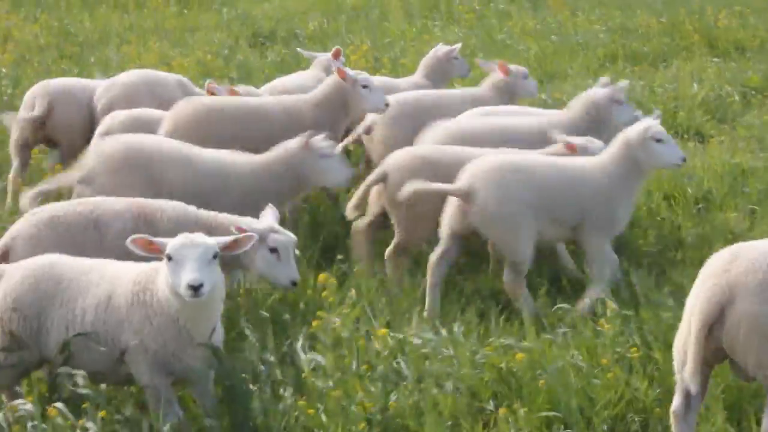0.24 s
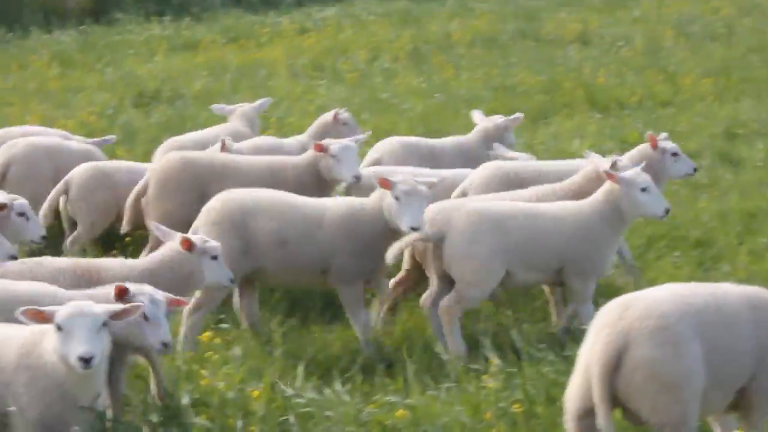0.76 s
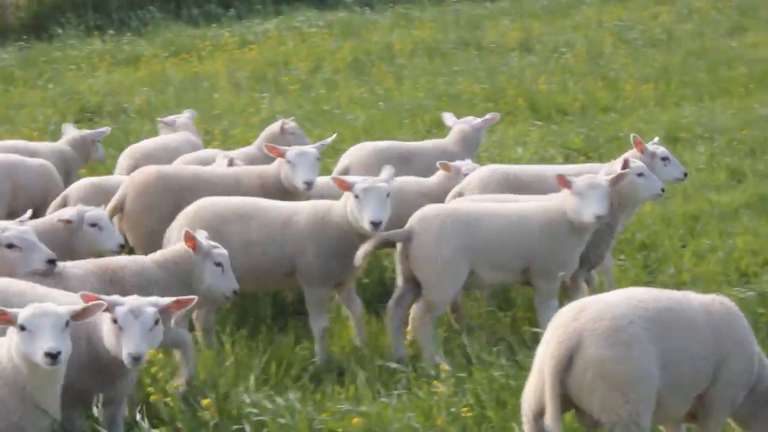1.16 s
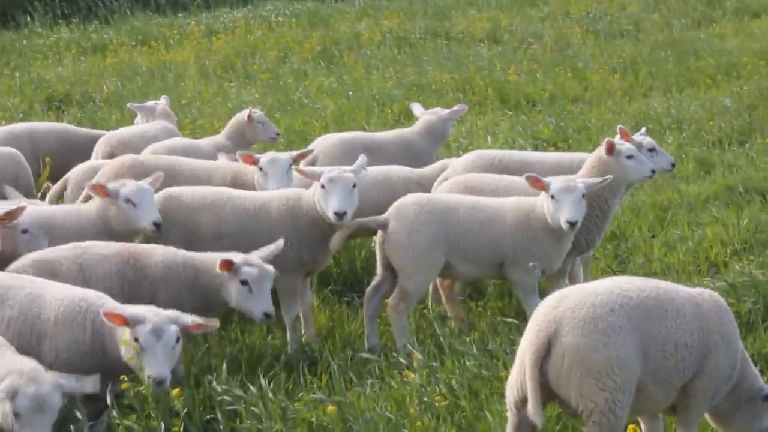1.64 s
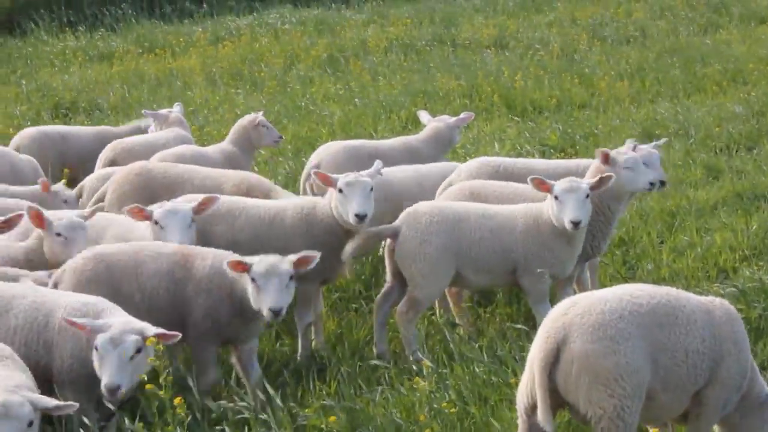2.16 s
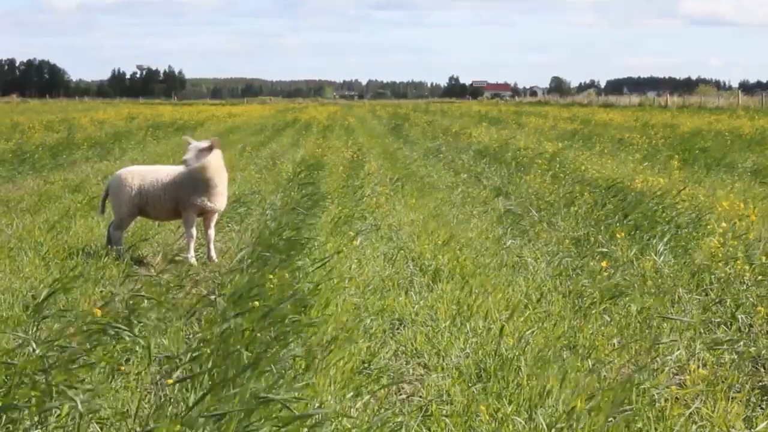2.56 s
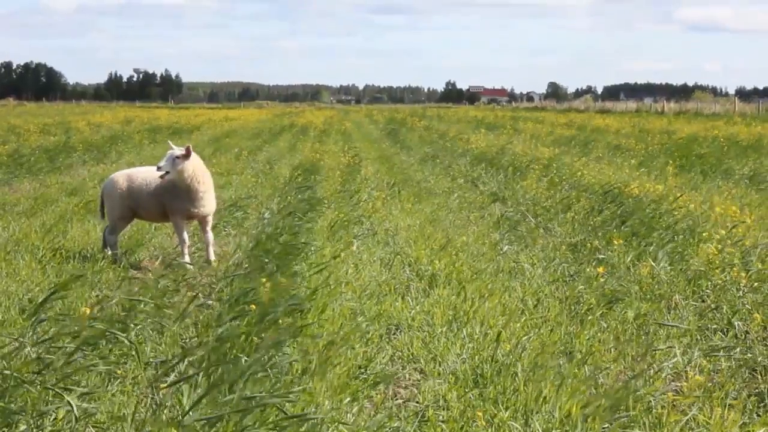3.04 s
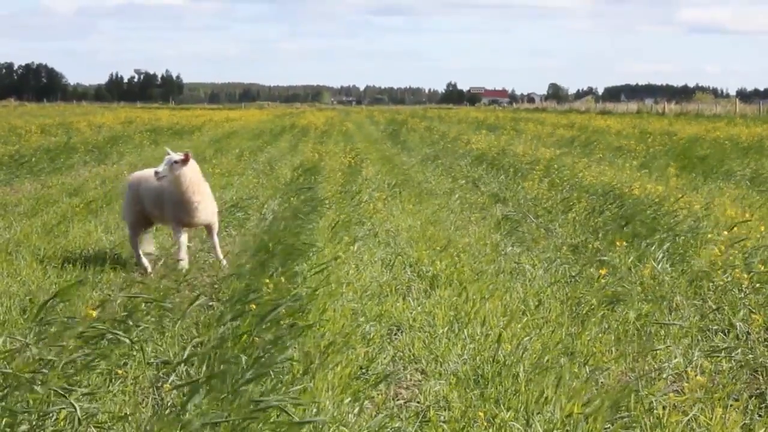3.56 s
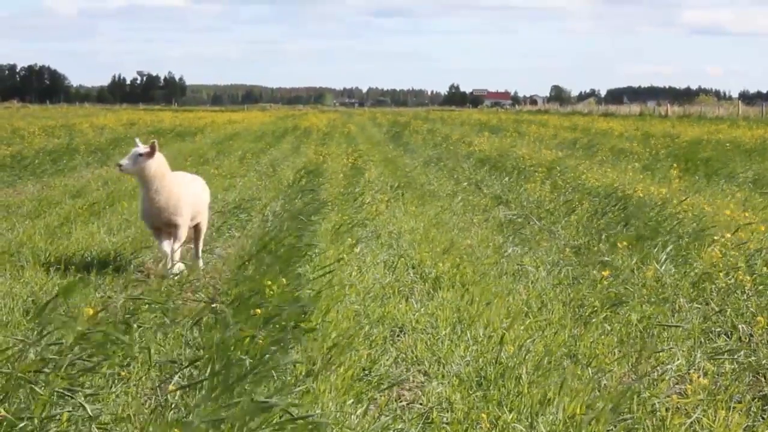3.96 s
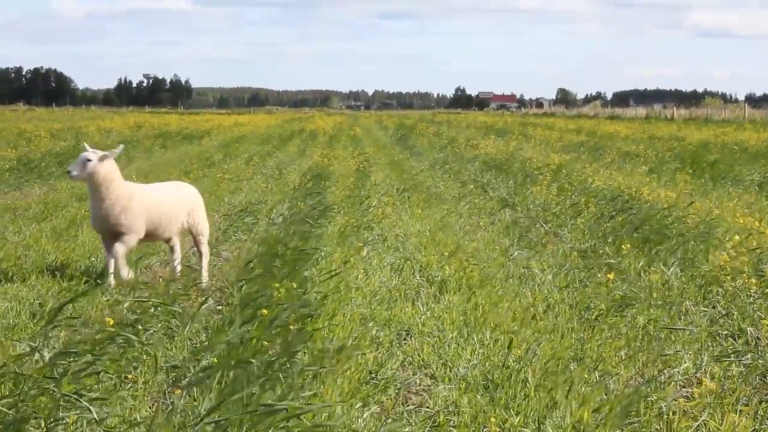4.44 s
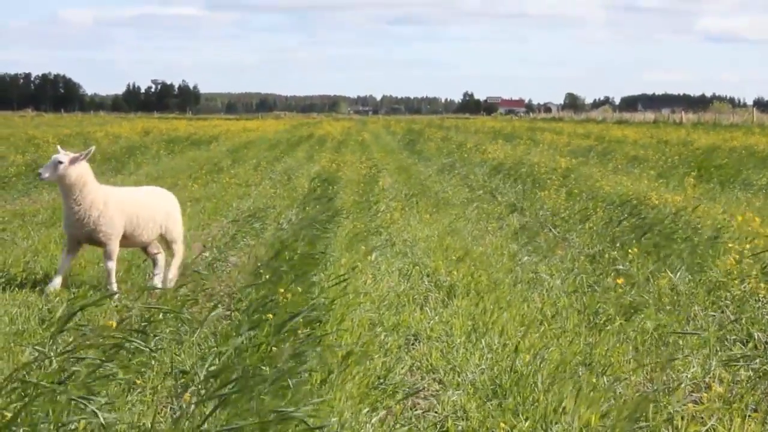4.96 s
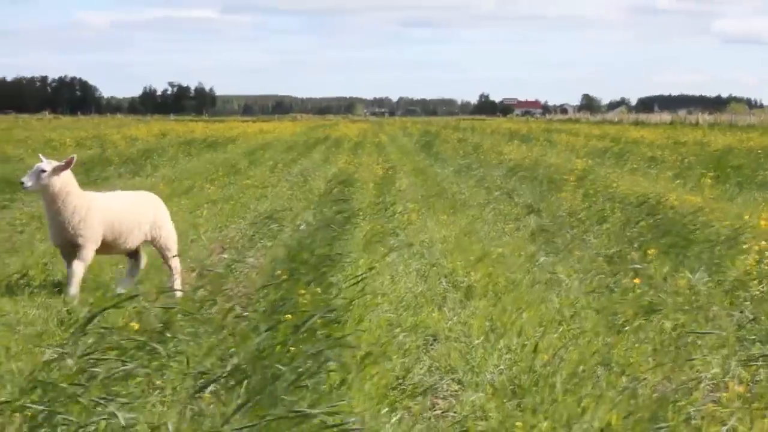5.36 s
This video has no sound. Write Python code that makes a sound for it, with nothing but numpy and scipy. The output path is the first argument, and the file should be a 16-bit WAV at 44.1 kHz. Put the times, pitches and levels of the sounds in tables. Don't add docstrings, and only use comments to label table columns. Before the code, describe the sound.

An open grassy field, dry and almost without echo. From 0 to about 2.4 s a flock tramples long grass, a soft bright rustle of tiny crackles. Over it come faint overlapping lamb calls: a trembling one at 0.4-1.1 s, a rough hoarse one at 0.75-1.2 s, a nearer choppy one at 1.2-1.6 s, and a low distant one at 1.5-1.9 s. A middling call fades from 2.1 to 2.6 s as the rustle vanishes. At 2.7-3.5 s one lamb bleats loudly, nasal and bright, starting through closed lips, opening wide, quavering quickly, then sagging into a brief breathy gasp. Dull low wind bumps hit the microphone irregularly throughout, hardest at 1.3 s, sparse during the loud bleat, clustered near 3.7-4.4 and 5.0-5.2 s. Afterwards the field is nearly silent, with small dry ticks from 3.6 s and a faint grass swish at 5.4 s.

```python
import sys
import numpy as np
from scipy import signal
from scipy.fft import rfft, irfft, next_fast_len
from scipy.io import wavfile
from scipy.ndimage import uniform_filter1d, map_coordinates

SR = 44100
rng = np.random.default_rng(int(sys.argv[2]) if len(sys.argv) > 2 else 0)


def output_pcm(signal):
    pcm = np.clip(np.atleast_2d(signal).T, -1, 1) * 32767
    wavfile.write(sys.argv[1], SR, np.round(pcm).astype(np.int16))


def boost(x):
    u = np.asarray(x, float) / 20
    return 10 ** u


N = 246959
SIZE = 1024

# (time [s], pitch [Hz], level [dB], mouth opening [0-1])
LONE_CALL = [
    (2.725, 187, -49.5, .65),
    (2.739, 166, -60, .75),
    (2.767, 214, -38, .9),
    (2.84, 236, -40, .97),
    (2.9, 243, -41.5, 1),
    (2.97, 237.5, -42, 1),
    (3.21, 239.5, -41.7, 1),
    (3.3, 232, -41.5, 1),
    (3.44, 203, -46.5, .92),
]
FIRST_CALL = [(.44, 270, -60, 0.7), (.52, 276.1, -58, 0.82), (.63, 275.5, -59, 1),
              (.72, 271.4, -57.5, 0.77), (.79, 283.3, -59.5, 0.92), (.9, 269.2, -58.5, 0.7),
              (1.0, 273.5, -59.5, 0.98), (1.05, 259.3, -58, 0.79)]
HOARSE_CALL = [(.76, 218.4, -59.5, 0.72), (.82, 219.6, -58, 0.86), (.9, 208.7, -57.5, 0.54),
               (.98, 205.2, -60, 0.72), (1.155, 206.9, -59, 0.63)]
NEAR_CALL = [(1.2, 263.2, -54.5, 0.49), (1.23, 270, -53, 0.62), (1.28, 250, -62.5, 0.63),
             (1.38, 269.7, -59.5, 0.82), (1.52, 265.5, -53, 0.67), (1.596, 269.4, -56.5, 0.7)]
FAR_CALL = [(1.52, 158, -63, 0.9), (1.62, 157, -63, .9), (1.69, 158, -63, 1), (1.76, 160, -63, 0.85),
            (1.82, 148, -67, .77), (1.87, 145, -69, 0.72)]
FADING_CALL = [(2.085, 224, -63, .9), (2.145, 236, -58, 1), (2.17, 241, -56, 1), (2.19, 224, -57.5, 1),
               (2.27, 224.5, -58, 1), (2.4, 222, -65, 1), (2.6, 208, -75, .9)]

# (time [s], level drop [dB])
LONE_CATCH = [(2.8034, 5), (2.8662, 3.5), (2.9272, 1.3), (2.9927, 0.5), (3.0579, 6), (3.1226, 3.5),
              (3.1901, 2), (3.2579, 1.5), (3.3295, 6), (3.408, 7), (3.462, 5.5)]
FIRST_CATCH = [(s, 3.1) for s in (.466, .56, .701, .83, .863, .941, .995)]
HOARSE_CATCH = [(.788, 4.4), (.861, 8.7), (.944, 8), (1.02, 7), (1.1, 6.7)]
NEAR_CATCH = [(1.33, 6), (1.408, 8.7), (1.484, 15.6), (1.555, 21)]
FAR_CATCH = [(1.629, 1), (1.72, 1.5), (1.81, 1.5)]
FADING_CATCH = [(2.121, 11), (2.263, 3.6), (2.289, 1.2), (2.328, 1.6), (2.361, 2.6), (2.43, 2.5),
                (2.496, 1.9), (2.57, 10)]

# (width [s], added width [s/dB], pitch drop [share], added drop [share/dB])
LONE_QUAVER = (.0098, .0008, .048, .0082)
FIRST_QUAVER = (.012, 0.0022, .033, 0.00076)
HOARSE_QUAVER = (0.021, 0.0005, .058, 0.0013)
NEAR_QUAVER = (0.019, 0.000429, 0.031, 0.00115)
FAR_QUAVER = (0.0081, 0.0055, 0.021, 0.014)
FADING_QUAVER = (0.0077, 0.00087, 0.052, 0.0033)

# (frequency [Hz], width [Hz], level [dB], sinking with a shut mouth [share])
LONE_THROAT = [(234, 160, -20.5, 0.055), (974, 57.5, 3.5, 0.52), (1297, 94, -11, .3), (2214, 160, 2, 0.16),
               (3525, 380, 2, 0.077), (4200, 250, 2.5, 0.05), (5280, 490, -11.5, 0.25),
               (6300, 160, -11.5, 0.045), (6900, 400, -47, .05), (8300, 500, -47, .05),
               (10570, 85, -23.5, 0.028)]
FIRST_THROAT = [(980, 155, -3.5, 0.23), (1540, 320, -12.5, 0.16), (2503, 140, 0.5, 0.34),
                (3620, 320, -5, 0.055), (5330, 850, -16, .03)]
HOARSE_THROAT = [(1003, 160, 9.5, 0.14), (2155, 280, 12, 0.19), (3670, 780, -1.5, 0.046)]
NEAR_THROAT = [(1068, 76, 12.5, 0.22), (2230, 730, -2, 0.19), (3640, 210, -1.5, 0.093),
               (5100, 520, -11, 0.026)]
FAR_THROAT = [(725, 87, 4.5, 0.2), (2034, 140, 7, 0.45), (2820, 1180, -4, .05)]
FADING_THROAT = [(982, 58, 2.5, 0.12), (2180, 170, -1, 0.071), (3420, 410, -8.5, 0.1),
                 (5560, 1600, -9.5, 0.035)]
# (frequency [Hz], width [Hz], depth [dB])
LONE_HOLLOWS = [(4700, 300, 14), (6600, 250, 7), (7600, 350, 10), (8300, 3000, 8), (9600, 450, 5),
                (13000, 1300, 12), (17000, 6000, 30)]

# (time [s], swing [share])
TURN = [(2.75, 0.22), (2.86, 0.14), (2.93, 0.7), (3.1, 1.07), (3.45, 0.97)]
# (frequency [Hz], level [dB])
FACING = [(2600, 1), (3400, -4), (4300, 2.5), (6300, 1), (7200, 6), (8400, 16.5), (9000, 3), (10500, 3),
          (11800, 6.5)]
PURSED = [(2.7, 3.5), (2.72, 0)], [(2500, -2.5), (3000, -12), (3600, -1.5)]
MUFFLED = [(2.745, 2), (2.765, 0.5)], [(700, -1.5), (1500, 1), (4500, -1), (5200, -1.5)]
TIRING = [(3.3, 0), (3.37, 1)], [(1000, 2), (1700, 2.5), (2600, -2.5), (3500, -8), (4300, -1), (5600, -1.5),
          (6300, -5), (12000, 1.5)]
TURNING = [(2.16, 3.5), (2.23, 1)], [(4500, -1.5), (5200, -3.5)]
NARROWED = [(2.18, 0.5), (2.2, 2.5)], [(700, -0.5), (980, -2), (1400, -1)]
LIFTED = [(1.69, -0.5), (1.74, 0.5), (1.82, -0.3)], [(2300, -3.5), (3000, 7), (4000, -5)]

ONSET_DB, RELEASE_DB, ONSET_FLAT = 18, 13, .035
OPENING_HZ, MOST_SLACK_DB = 500, 3.5
WANDER, DULLING = .006, .09

# (time [s], peak [dB], frequency [Hz])
EDDIES = [(0.033, -39.5, 247.0), (0.045, -40.5, 122.0), (0.089, -35, 205), (0.098, -37, 145.0),
          (0.27, -36.5, 147), (0.576, -39, 205), (0.585, -43, 85.0), (1.068, -33, 200), (1.294, -40.5, 121),
          (1.31, -29.5, 102), (1.405, -49, 59.6), (1.444, -42, 122.0), (1.466, -43, 84), (1.513, -46, 85.0),
          (1.551, -35.5, 172), (1.691, -38, 172), (1.712, -38.5, 84), (1.732, -34.5, 122.0),
          (1.796, -42.5, 101), (1.872, -42, 86), (2.078, -44.5, 210), (2.24, -38, 173.0), (2.357, -37, 144),
          (2.37, -34, 146), (2.383, -32.5, 175), (2.409, -41, 212), (2.422, -42.5, 103),
          (3.543, -42.5, 103), (3.685, -43.5, 105), (3.724, -28.5, 293), (3.737, -39, 122.0),
          (3.746, -33.5, 102), (3.756, -35, 147), (3.769, -37.5, 173.0), (3.869, -39, 240),
          (3.911, -43, 102.0), (3.92, -35, 169), (4.083, -30.5, 121), (4.211, -37, 103), (4.232, -38, 169),
          (4.247, -45, 85.0), (4.347, -41, 101), (4.356, -28.5, 122), (4.365, -46, 72.0),
          (4.915, -36.5, 178), (4.924, -46, 60.0), (4.984, -41, 86), (4.998, -40.5, 102.0), (5.03, -43, 86),
          (5.051, -41, 205), (5.08, -37.5, 173.0), (5.1, -37, 145.0), (5.115, -39, 142),
          (5.127, -40, 207.0), (5.147, -43, 172.5), (5.555, -38, 121), (5.564, -34.5, 148),
          (5.584, -40.5, 173.0),
          (0.07, -49, 122.0), (0.26, -43, 121), (0.339, -43.5, 145.0), (0.545, -42, 172),
                (0.991, -46.5, 125), (1.021, -47, 122.0), (1.078, -44, 103), (1.188, -45, 240),
                (1.323, -40, 58.9), (1.351, -44, 102.0), (1.413, -41, 145.0), (1.425, -41, 85.0),
                (1.455, -40.5, 175), (1.495, -41, 180), (1.529, -39.5, 123), (1.561, -43, 173.0),
                (1.658, -46, 60.0), (1.72, -42, 122.0), (1.752, -41.5, 175), (1.847, -46.5, 101),
                (1.863, -44, 120), (2.089, -43, 102.0), (2.307, -44.5, 85.5), (2.347, -44, 172),
                (2.397, -44, 60.3), (2.493, -41.5, 145.0), (3.13, -47.5, 178), (3.516, -45, 151.2),
                (3.526, -48, 125), (3.66, -46, 60.4), (3.79, -48, 145.0), (3.878, -38, 145.0),
                (3.901, -50, 102.0), (3.93, -44, 247.0), (3.939, -43, 72.0), (3.996, -47, 60.0),
                (4.016, -40.5, 105), (4.092, -58, 103), (4.116, -45, 144), (4.262, -45, 85.0),
                (4.335, -41, 102.0), (4.381, -43.5, 102.0), (4.506, -47, 60.0), (4.566, -45, 122.0),
                (4.604, -45, 121), (4.668, -44.5, 147), (4.747, -47, 59.7), (4.956, -46, 72.0),
                (5.039, -41, 145.0), (5.064, -42, 147), (5.138, -41.5, 207.0), (5.167, -47, 85.0),
                (5.189, -42.5, 144), (5.287, -45, 147), (5.303, -44.5, 85.0), (5.314, -45.5, 86),
                (5.403, -47.5, 103), (5.573, -43, 101), (5.598, -48, 242)]
# (time [s], peak [dB], frequency [Hz])
FLICKS = [(0.035, -51.5, 380.0), (0.057, -48, 328), (0.089, -44, 368), (0.096, -52, 328), (0.263, -40, 323),
          (0.272, -58, 332), (0.283, -53, 383), (0.577, -47.5, 380.0), (1.068, -44, 332.2),
          (1.19, -45, 433), (1.292, -53, 330.0), (1.314, -36.5, 328), (1.547, -53, 383),
          (1.556, -42.5, 372), (1.69, -53, 330.0), (1.711, -47, 324), (1.733, -52, 380.0),
          (1.741, -46, 327), (1.756, -57.5, 378), (2.077, -50.5, 368), (2.23, -47.5, 372),
          (2.238, -50.5, 380.0), (2.276, -52, 380.0), (2.356, -42.5, 430), (2.37, -56, 380.0),
          (2.377, -41, 380), (2.407, -42, 328), (2.419, -50, 493), (3.719, -53, 330.0), (3.73, -68, 330.0),
          (3.743, -47, 330.0), (3.754, -47, 380.0), (3.762, -61, 331), (3.771, -52, 380.0),
          (3.87, -42.5, 324), (3.918, -66, 330.0), (3.93, -62, 380.0), (4.081, -53, 306), (4.208, -52, 374),
          (4.231, -60, 380.0), (4.357, -54, 322), (4.914, -54, 326), (5.037, -48, 330.0),
          (5.05, -66, 380.0), (5.073, -52, 326), (5.083, -44, 330.0), (5.098, -39.5, 462),
          (5.125, -39.5, 430.0), (5.136, -42.5, 490.0), (5.15, -47, 330.0), (5.169, -54.5, 330.0),
          (5.188, -49.5, 380.0), (5.555, -50.5, 330.0), (5.563, -44.5, 326), (5.585, -53, 332),
          (5.599, -45, 380.0)]
# (start [s], length [s], peak [dB])
FLURRIES = [(0.146, 0.023, -55), (0.288, .04, -44.5), (0.803, 0.079, -48.5), (1.9, 0.018, -47.5),
            (2.195, 0.037, -49.5), (2.252, 0.044, -55), (2.513, .03, -46.5), (2.629, 0.065, -53.5),
            (2.729, 0.022, -45.5), (2.82, 0.038, -54.5), (3.205, .02, -57), (3.63, 0.011, -46),
            (3.836, .01, -49), (4.864, .04, -49), (5.205, .01, -58), (5.257, 0.011, -57)]
# (time [s], peak [dB], frequency [Hz])
SLAP = (1.3032, -13, 185)
# (frequency [Hz], density [dB per Hz])
SPRAY = [(30, -32), (100, 1.5), (250, -0.5), (500, -19), (900, -31.5), (1400, -46), (2500, -120)]
# (time [s], level [dB])
BUFFET = [(0, -66), (.28, -64), (.78, -68.5), (1.53, -55), (1.72, -60), (1.87, -65.5), (2.11, -69),
          (2.32, -58), (2.85, -78), (3.35, -76.5), (3.59, -65), (3.8, -60.5), (4.3, -61.5), (4.7, -68),
          (5.12, -57), (5.3, -63.5), (5.6, -64)]
# (frequency [Hz], density [dB per Hz])
RUMBLE = [(15, -29), (25, 0.5), (98, 7), (195, 0.5), (509, -20), (677, -49), (900, -21.5), (1170, -49),
          (1980, -120)]
SHED_S, SHED_SCATTER, WEAKER_DB = 0.019, 0.39, 5.5
SMALL_HZ, SMALL_SPREAD, HZ_PER_DB = 145, 0.34, 2.5

# (time [s], peak [dB], rebound [dB])
TICKS = [(3.6084, -60, -8), (3.7743, -70, -12), (3.8513, -61, -10), (3.8876, -68, -12), (4.141, -66, -10),
         (4.2627, -69, -12), (4.4322, -60, -10), (4.5633, -66, -12), (4.581, -57, -12), (4.7953, -58, -6),
         (4.809, -65, -12), (5.029, -56, 0), (5.3787, -66, -12)]
# (frequency [Hz], level [dB], t60 [s])
HOUSING = [(2100, -4, .006), (3500, -6, .004), (4700, 0, .006), (6100, -1, .006), (7800, -4, .005),
           (9800, -8, .004), (11700, -6, .005)]

# (time [s], level [dB])
TRAMPLE = [(0.0, -62.5), (0.11, -65), (0.66, -62), (1.49, -69.5), (1.6, -65), (2.37, -76), (2.68, -108)]
# (frequency [Hz], density [dB per Hz])
GRASS = [(350, -53), (600, -2.5), (941, -4.5), (1400, -1.5), (3120, 2.5), (6690, -1.5), (9270, -1),
         (15600, -5)]
# (time [s], level [dB])
HUSH = [(0, -84), (2.6, -84), (2.78, -91), (3.48, -91)]
# (time [s], level [dB])
BREEZE = [(3.55, -89.5), (4.24, -86), (5.6, -86)]
# (frequency [Hz], density [dB per Hz])
FIELD = [(200, -30), (350, -8), (800, -11), (930, -9), (2300, -15), (6700, -19), (12800, -24), (15600, -28)]


def lone_lamb():
    fading = bleat(voiced(FADING_CALL, onset_s=.02), quaver(FADING_CATCH, FADING_QUAVER), FADING_THROAT,
                   [LONE_HOLLOWS[0], (10500, 5000, 12)], [TURNING, NARROWED],
                   jitter=.004, shimmer_db=1.2, breath=.07)
    loud = bleat(voiced(LONE_CALL, onset_s=.032, sag=.13, lips=1), quaver(LONE_CATCH, LONE_QUAVER),
                 LONE_THROAT, LONE_HOLLOWS, [(TURN, FACING), PURSED, MUFFLED, TIRING],
                 jitter=.003, shimmer_db=.7, breath=.04, overshoot=.7, damp=2.5)
    t = np.arange(N) / SR
    air = rush([(600, -40), (1250, -1), (1600, -16), (2100, 0), (3200, -8), (4300, -2), (5600, -18),
                (7300, -10), (10000, -40)], patchy_db=2)
    gasp = boost(-65) * np.exp(-((t - 3.479) / .009) ** 2) * air
    return meadow(fading + boost(-2.0) * loud, wet_db=-22, t60=.1) + gasp


def flock():
    first = bleat(voiced(FIRST_CALL, release_s=.018), quaver(FIRST_CATCH, FIRST_QUAVER), FIRST_THROAT,
                  jitter=0.005, breath=0.07)
    hoarse = bleat(voiced(HOARSE_CALL, release_s=.02), quaver(HOARSE_CATCH, HOARSE_QUAVER), HOARSE_THROAT,
                   jitter=.03, shimmer_db=1.5, breath=.28, uneven_db=1.2)
    near = bleat(voiced(NEAR_CALL, onset_s=.022, release_s=.018), quaver(NEAR_CATCH, NEAR_QUAVER),
                 NEAR_THROAT, jitter=.003, breath=.07, damp=2.5)
    far = bleat(voiced(FAR_CALL, onset_s=.04, release_s=.04), quaver(FAR_CATCH, FAR_QUAVER), FAR_THROAT,
                colours=[LIFTED], jitter=.006, shimmer_db=1.1, breath=.14, uneven_db=1.5)
    return meadow(first + hoarse + near + boost(1.5) * far, wet_db=-15, t60=.15)


def bleat(call, catches, throat, hollows=(), colours=(), jitter=.004, shimmer_db=-0.7, breath=.08,
          overshoot=0.27, damp=0.31, uneven_db=0):
    s, pitch, level, mouth = np.transpose(call)
    t = np.arange(s[0], s[-1], 1 / SR)
    sag, drop_db = larynx_catches(t, catches, overshoot)
    cycles = np.cumsum(np.interp(t, s, pitch) * (1 - sag)) / SR
    luck = rng.standard_normal((int(cycles[-1]), 2))
    times = np.interp(np.arange(len(luck)) + jitter * luck[:, 0], cycles, t)
    slack = np.interp(times, t, drop_db)[:, None]
    shut = 1 - np.clip(np.interp(times, s, mouth), 0, 1)[:, None] + .012 * slack
    deep = np.clip(slack - MOST_SLACK_DB, 0, MOST_SLACK_DB)
    tract = throat_response(times, throat, hollows, colours, slack, shut, deep, damp)
    rings = irfft(tract * glottal_pulses(times, breath, deep))
    rings *= np.minimum(1, np.arange(SIZE, 0, -1) / (SIZE // 4))
    rings /= np.sqrt(np.median(np.sum(rings ** 2, 1)) * np.mean(pitch) / SR)
    alternation = uneven_db * (-1) ** np.arange(len(luck))
    loudness = np.interp(times, s, level) + shimmer_db * luck[:, 1] + alternation
    return scatter(times - SIZE // 16 / SR, rings * boost(loudness)[:, None] * boost(-.8 * slack))


def larynx_catches(t, catches, overshoot):
    sag, drop_db = np.zeros(len(t)), np.zeros(len(t))
    for at, width, share, db in catches:
        u = (t - at) / width
        u = np.where(u > 0, u / 1.14, u)
        spring = overshoot * np.exp(-2 * (abs(u) - 1.53) ** 2)
        sag += share * (np.exp(-u ** 2) - spring)
        drop_db += db * np.exp(-(1.66 * (u - .12)) ** 2)
    return sag, drop_db


def throat_response(times, throat, hollows, colours, slack, shut, deep, damp):
    f = np.fft.rfftfreq(SIZE, 1 / SR)
    power = 1e-9
    for hz, width, db, sink in throat:
        drift = WANDER * wobble(16)[(times * SR).astype(int), None]
        centre = hz * (1 - sink * shut - .01 * deep + drift)
        leak = damp * np.minimum(slack, MOST_SLACK_DB) * min(1, 1000 / hz) ** 2 / 6
        wide = width * (1 + leak + deep / 5) * (1 - .75 * shut)
        ring = (boost(db) * width * f) ** 2 / ((centre * centre - f * f) ** 2 + (f * wide) ** 2)
        power = power + ring / (1 + ((f - centre) / (6 * width)) ** 2)
    gain = np.log(power) / 2 - DULLING * slack * np.exp(-20 * (f / 6200 - 1) ** 2)
    for hz, width, db in hollows:
        gain = gain - np.log(boost(db)) / (1 + ((f - hz) / width * 2) ** 2)
    for share, change in colours:
        tilt = np.log(boost(np.interp(f, *np.transpose(change))))
        gain += np.interp(times, *np.transpose(share))[:, None] * tilt
    cepstrum = irfft(gain)
    cepstrum[:, 1:SIZE // 2] *= 2
    cepstrum[:, SIZE // 2 + 1:] = 0
    return np.exp(rfft(cepstrum))


def glottal_pulses(times, breath, deep):
    f = np.fft.rfftfreq(SIZE, 1 / SR)
    late = times * SR - np.round(times * SR) + SIZE // 16
    opening = -((1 + 1j * f / OPENING_HZ) / (1 - 1j * f / OPENING_HZ)) ** 2
    snap = opening * np.exp(-2j * np.pi * f * late[:, None] / SR)
    puff = rng.standard_normal((len(times), SIZE)) * np.exp(-np.arange(SIZE) / (SR * 0.0036))
    hiss = f * f / (f * f + OPENING_HZ ** 2) + (f / 3500) ** 2
    return snap + breath * (1 + deep) * hiss * rfft(puff) / 6


def voiced(call, onset_s=.035, release_s=0.0325, sag=0.04, lips=0.32):
    u = np.linspace(0, 1, num=7)[1:, None]
    first, last = np.array(call[0]), np.array(call[-1])
    start = first - [onset_s, ONSET_FLAT * first[1], ONSET_DB, lips * first[3]]
    end = last + u * [release_s, -sag * last[1], 0, -.1 * last[3]]
    end = end - u ** 3 * [0, 0, RELEASE_DB, 0]
    return np.vstack([start, call, end])


def quaver(catches, law):
    width, per_db, share, share_per_db = law
    return [(s, width + per_db * db, share + share_per_db * db, db) for s, db in catches]


def meadow(x, wet_db, t60):
    t = np.arange(SR // 3) / SR
    tail = rng.standard_normal(len(t)) * boost(-60 * t / t60) * (t > .004)
    return x + boost(wet_db) * signal.fftconvolve(x, tail / np.linalg.norm(tail))[:N]


def wind():
    s, db, hz = np.vstack([EDDIES, FLICKS, flurries()]).T[:, :, None]
    t = np.arange(-SIZE * 2, SIZE * 2) / SR
    luck = rng.uniform(0, 1, (len(s), 2))
    length = 0.36 + 0.081 * luck[:, :1] + 0.26 * (hz > 320)
    swell = boost(db) * np.exp(-abs(t * hz / length) ** 2)
    eddies = swell * np.sin(2 * np.pi * (hz * t + luck[:, 1:]))
    eddies -= eddies.sum(1, keepdims=True) * np.exp(-(t / 0.0045) ** 2) / (0.023 * SR * np.sqrt(np.pi))
    wake = boost(db - 22) * (np.minimum(hz, 215) / 160) ** 3 * np.exp(-abs(t) / np.where(t < 0, .005, .012))
    spray = scatter(s[:, 0] + t[0], wake) * rush(SPRAY, patchy_db=-1.5)
    u = (np.arange(N) / SR - SLAP[0]) * SLAP[2]
    slap = boost(SLAP[1]) * np.exp(-abs(u / np.where(u < 0, .09, .4)) ** 2) * np.sin(2 * np.pi * u)
    lumps = boost(2.8 * wobble(25))
    buffeting = boost(curve(BUFFET) + 1.3) * unit(lumps * rush(RUMBLE, patchy_db=2.5))
    return scatter(s[:, 0] + t[0], eddies) + spray + slap + buffeting


def flurries():
    start, length, db = np.transpose(FLURRIES)[:, :, None]
    luck = rng.uniform(0, 1, (len(start), 2, 10))
    order = np.arange(10)
    after = SHED_S * (order + SHED_SCATTER * (luck[:, 0] - .5) * (order > 0))
    shortfall = WEAKER_DB * (1 + np.log(luck[:, 1] * .9 + .1))
    size = db + shortfall * np.clip(length / SHED_S - .6, 0, 1)
    hz = (SMALL_HZ + HZ_PER_DB * (size + 45)) * np.exp(SMALL_SPREAD * rng.standard_normal(size.shape))
    return np.stack([start + after, size - WEAKER_DB * (length > SHED_S), hz], -1)[after <= length]


def ticks():
    s, db, rebound_db = np.transpose(TICKS)[:, :, None]
    t = np.arange(SIZE) / SR
    luck = rng.standard_normal((len(s), len(HOUSING)))
    tap = np.zeros((len(s), SIZE))
    for k, (hz, level, t60) in enumerate(HOUSING):
        decay = boost(level + 2.5 * luck[:, [k]] - 60 * t / t60)
        tap += decay * np.sin(2 * np.pi * hz * t * (1 + .02 * luck[:, [k - 1]]))
    tap += .7 * rng.standard_normal(tap.shape) * boost(-60 * t / .006)
    tap = boost(db - 2.5) * tap * (1 - np.exp(-t / .0003))
    return scatter(s[:, 0], tap) + scatter(s[:, 0] + 0.0044, boost(rebound_db) * tap)


def grass():
    crackle = boost(1.2 * wobble(300) + 1.04 * wobble(30.4))
    trample = boost(curve(TRAMPLE + [(2.75, -100)]) + 1.0) * unit(crackle * rush(GRASS, patchy_db=1.5))
    breeze = boost(curve(HUSH + BREEZE) + 10.5 + 1.0 * wobble(9.9)) * rush(FIELD, patchy_db=2.2)
    t = np.arange(N) / SR
    swish = rush([(4000, -30), (8000, -4), (11000, 0), (15000, -8)], patchy_db=1.5)
    tuft = boost(-76.5) * np.exp(-((t - 5.41) / 0.047) ** 2) * swish
    return trample + breeze + tuft


def rush(spectrum, patchy_db):
    z = signal.stft(rng.standard_normal(N + 512), SR, nperseg=512)[2]
    patches = uniform_filter1d(uniform_filter1d(rng.standard_normal(z.shape), 12, 0), 5, 1)
    x = signal.istft(z * boost(patchy_db * unit(patches)), nperseg=512)[1][:N]
    hz, level = np.transpose(spectrum)
    m = next_fast_len(N + 8192)
    colour = boost(np.interp(np.log(np.fft.rfftfreq(m, 1 / SR) + 1), np.log(hz), level))
    return unit(irfft(rfft(x, m) * colour, m)[:N])


def scatter(times, grains):
    at = np.round(times * SR).astype(int)[:, None] + np.arange(grains.shape[1])
    ok = (at >= 0) & (at < N)
    return np.bincount(at[ok], grains[ok], N)


def curve(rows):
    return np.interp(np.arange(N) / SR, *np.transpose(rows))


def wobble(rate):
    return map_coordinates(rng.standard_normal(int(N * rate / SR) + 4), [np.arange(N) * rate / SR])


def unit(x):
    return x / np.sqrt(np.mean(x ** 2) + 1e-20)


def scene():
    return (lone_lamb() + flock() + wind() + ticks() + grass())[None]


def band_limit(x):
    return signal.sosfilt(signal.butter(12, 15720, fs=SR, output="sos"), x)


def record(dry):
    ceiling = np.where(np.arange(N) < 2.1 * SR, .0275, 1)
    x = np.clip(dry, -ceiling, ceiling)
    m = next_fast_len(N + SIZE)
    f = np.fft.rfftfreq(m, 1 / SR)
    low_cut = 1j * f / (44 + 1j * f)
    x = irfft(rfft(x, m) * (f < 15720) * low_cut, m)[:, :N]
    return band_limit(x)


dry = scene()
out = record(dry)
output_pcm(out)
```